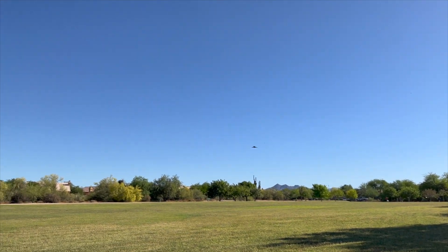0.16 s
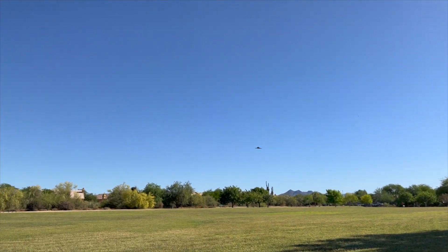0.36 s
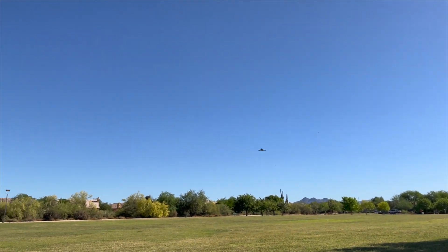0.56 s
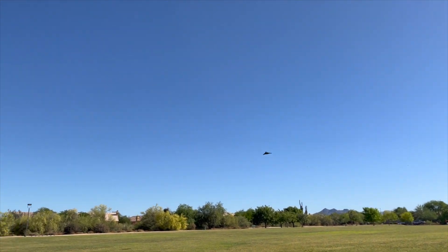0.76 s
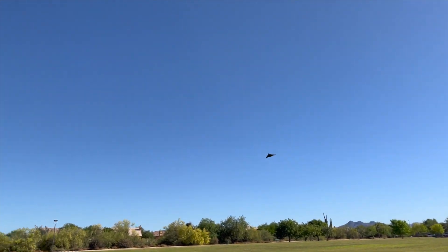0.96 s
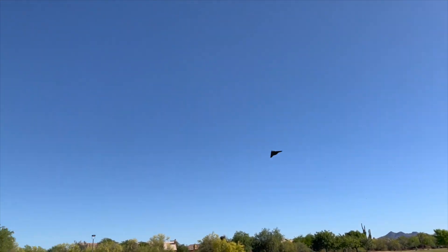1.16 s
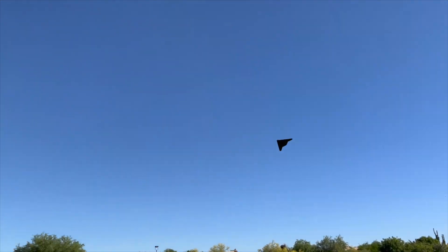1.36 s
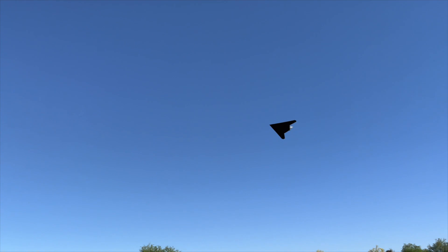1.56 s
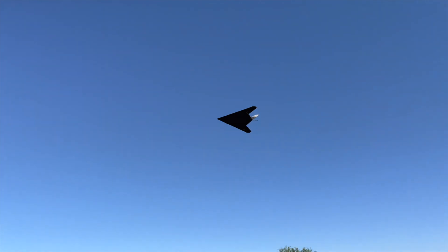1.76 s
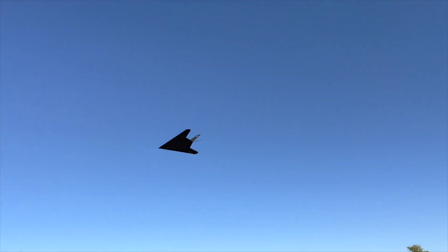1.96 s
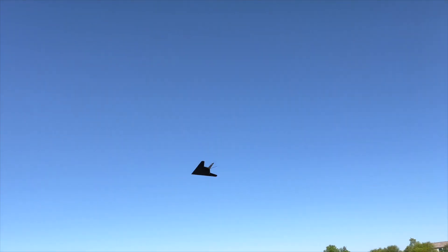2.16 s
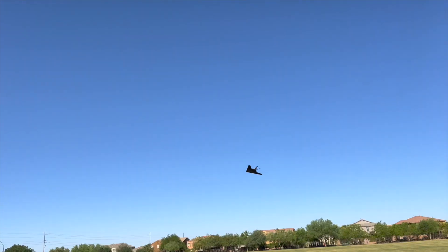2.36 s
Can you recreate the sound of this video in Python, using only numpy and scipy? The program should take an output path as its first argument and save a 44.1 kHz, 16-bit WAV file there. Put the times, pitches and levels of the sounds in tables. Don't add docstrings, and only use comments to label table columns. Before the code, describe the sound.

An electric ducted-fan model jet flies past, its whine and airy rush swelling, then falling in pitch

```python
import sys
import numpy as np
from scipy import signal
from scipy.fft import rfft, irfft
from scipy.io import wavfile
from scipy.ndimage import uniform_filter1d, map_coordinates

SR = 44100
rng = np.random.default_rng(int(sys.argv[2]) if len(sys.argv) > 2 else 0)


def put_to_file(sound):
    columns = np.atleast_2d(sound).T
    safe = np.clip(columns, -1, 1)
    whole_steps = np.round(safe * 32767)
    wavfile.write(sys.argv[1], SR, whole_steps.astype(np.int16))


def to_linear_factor(level_db):
    exponent = np.asarray(level_db, float) / 20
    return 10 ** exponent


N = 106192

HZ = np.fft.rfftfreq(N, 1 / SR) + 1e-3
LEFT_RIGHT = np.array([[1], [-1]])
BLADES = 11

# (frequency [Hz], left leads by [rad], left over right [dB], unrelated share [0-1])
PORTS = [(100, -.1, -1, .3), (600, -.3, -2.7, .08), (1300, -.2, -2.3, .25), (1700, -.7, -.5, .45),
         (2300, -.2, -1.5, .12), (3300, .25, 1.5, .14), (4300, -1.2, -2, .45), (4900, -3.4, -2, .5),
         (5600, -4.2, -1, .4), (6350, -3.14, -.5, .25), (7500, -4.5, -2, .15), (9300, -6.28, 0, .03),
         (12600, -9.42, 0, .03), (15500, -12.5, 0, .05)]


def walk(rate):
    hold = int(SR / rate)
    held = rng.standard_normal(N // 32)[np.arange(N) // hold]
    return 1.55 * uniform_filter1d(uniform_filter1d(held, hold), hold)


def smear(rate):
    return walk(rate) + 1j * walk(rate)


def across(table, column=1):
    table = np.array(table, float)
    return np.interp(np.log(HZ), np.log(table[:, 0]), table[:, column])


def curve(table, column=1):
    table = np.array(table, float)
    line = np.interp(np.arange(N) / SR, table[:, 0], table[:, column])
    return uniform_filter1d(line, size=2500, mode="nearest")


def air(colour, flicker_db, rate):
    inside = (HZ > colour[0][0]) & (HZ < colour[-1][0])
    spectrum = rfft(rng.standard_normal(N)) * to_linear_factor(across(colour)) * inside
    place = 3 * np.log2(HZ)
    noise = 0
    for band in range(int(place[inside][0]), int(place[inside][-1]) + 2):
        share = np.clip(1 - abs(place - band), 0, 1)
        noise = noise + irfft(spectrum * share, N) * to_linear_factor(flicker_db * walk(rate))
    return noise / np.std(noise)


def hump(centre_hz, wide_hz):
    return np.exp(-((HZ - centre_hz) / wide_hz) ** 2)


def ports(sound, extra_rad=0):
    gap = to_linear_factor(across(PORTS, column=2) / 2) * np.exp(.5j * (across(PORTS) + extra_rad))
    return irfft(rfft(sound) * np.array([gap, 1 / gap]), N)


def field():
    # (frequency [Hz], level [dB per Hz])
    rumble = [(12, -56), (20, -24.5), (65, -0.5), (92, -6.5), (124, -7), (178, -23.5), (289, -19),
              (325, -38), (450, -18.5), (580, -33), (990, -120)]
    # (time [s], swell [dB], length [s])
    gusts = [
        (.18, 6, .06),
        (.55, 7, .05),
        (.79, 4, .04),
        (.95, 6, .07),
        (1.29, 4, .04),
        (1.47, 3, .04),
        (1.83, 8, .05),
        (1.93, 8, .04),
    ]
    seconds = np.arange(N) / SR
    swell_db = sum(db * np.exp(-((seconds - at) / length) ** 2) for at, db, length in gusts)
    middle = air(rumble, flicker_db=0, rate=6.53)
    sides = to_linear_factor(-10) * air(rumble, flicker_db=0, rate=7) * LEFT_RIGHT
    return to_linear_factor(-48.5 + swell_db) * (middle + sides)


def grass_echo(tone, rest):
    # (time [s], lag [ms])
    ground_lag = [(0, .9), (.28, 1.01), (.53, 1.14), (.79, 1.32), (1.04, 1.6), (1.17, 1.75), (1.43, 2.29),
                  (1.68, 2.98), (1.81, 3.36), (1.94, 3.41), (2.07, 2.95), (2.2, 2.55), (2.32, 2.1),
                  (2.41, 1.85)]
    lag_ms = curve(ground_lag)
    mirrored = to_linear_factor(-3 - 1.3 * lag_ms) * rest + to_linear_factor(-24.5) * tone
    late = map_coordinates(mirrored, [np.arange(N) - lag_ms * SR / 1000], mode="mirror")
    dull = irfft(rfft(late) / np.sqrt(1 + (HZ / 6500) ** 4), N)
    return ports(dull, extra_rad=1.5 * hump(4650, 780))


def scattered(near_db, nose, belly):
    unrelated = np.clip(across(PORTS, column=3), 0, 1)
    stray = irfft(rfft(duct(near_db, nose, belly)) * unrelated * 1j, N)
    return stray * LEFT_RIGHT


def duct(near_db, nose, belly):
    # (frequency [Hz], level [dB per Hz])
    roar = [(60, -3), (90, -8), (170, -7), (330, -5.5), (500, -5.5), (870, -1), (1020, -2.5), (1300, -11)]
    rush = [(1000, -69), (1180, -1.5), (1550, 2.5), (1800, -5.5), (2100, -7), (2600, -5), (3400, -10),
            (4200, -26.5)]
    hiss = [(3600, -2.5), (4600, -6.5), (5600, 4), (6900, -1.5), (8500, -7), (10500, -12.5), (12500, -15.5),
            (15800, -18)]

    def layer(colour, db, follow, nose_db, belly_db, flicker_db):
        nearness_db = near_db[0] + follow * (near_db - near_db[0])
        level_db = db + nearness_db + nose_db * nose + belly_db * belly
        return air(colour, flicker_db, rate=13) * to_linear_factor(level_db)

    return (layer(roar, db=-8.5, follow=1.0941, nose_db=0, belly_db=3.5, flicker_db=1.1)
            + layer(rush, db=-0.79, follow=0.88, nose_db=-0.61, belly_db=1.33, flicker_db=1)
            + layer(hiss, db=-5.5, follow=1.0252, nose_db=-1.5, belly_db=-2, flicker_db=1))


def blades(phase, near_db, nose, belly):
    line_db = -8.5 - 5 * nose - 2.5 * belly + 2.5 * walk(20)
    line = to_linear_factor(line_db) * (1 + to_linear_factor(-8) * smear(66))
    shift = np.exp(1j * BLADES * 0.025 * phase)
    intake = to_linear_factor(-11 + 4 * nose) * smear(700) * shift
    return to_linear_factor(near_db) * np.imag((line + intake) * np.exp(1j * BLADES * phase))


def multiples(phase, near_db, nose, swing_db):
    # (multiple of the shaft, level over nearness [dB], gain nose-on [dB],
    #  share of the shaft tone's swing [0-1], flutter [dB], flutter rate [per s])
    orders = [
        (2, -13.5, 2, 0.57, 1, 18),
        (3, -12, 0.5, .05, 2, 14),
        (5, -26, 4, 0.036, 2.5, 14),
    ]
    total = 0
    for order, db, nose_db, share, flutter_db, rate in orders:
        level_db = near_db + db + nose_db * nose + share * swing_db + flutter_db * walk(rate)
        wave = np.sin(round(order) * phase + 6 * rng.random())
        total = total + np.sqrt(2) * to_linear_factor(level_db) * wave
    return total


def shaft(hz, tone_db):
    phase = 2 * np.pi * np.cumsum(hz * (1 + 0.00155 * walk(30.5))) / SR
    skirt = to_linear_factor(-26.5) * smear(79.52)
    loudness = np.sqrt(2) * to_linear_factor(tone_db + 0.66 * walk(8.73))
    return loudness * np.imag((1 + skirt) * np.exp(1j * phase)), phase


def scene():
    # (time [s], shaft tone [dB], nearness [dB])
    flight = [(0, -41.5, -46.5), (.45, -39, -45.5), (.75, -36.5, -43), (1.02, -34.5, -39),
              (1.2, -32, -37.5), (1.33, -35, -35.5), (1.45, -33.5, -34), (1.61, -20, -33.5),
              (1.78, -19, -31.5), (1.95, -17, -31), (2.05, -21, -32), (2.15, -35.5, -32.5),
              (2.24, -39.5, -33.5), (2.31, -33, -33), (2.41, -34.5, -34)]
    # (time [s], frequency [Hz])
    pitch = [(0, 629), (.5, 630), (1.05, 630.7), (1.36, 631.5), (1.5, 625), (1.66, 614), (1.78, 603),
             (1.87, 591.5), (2.04, 575), (2.17, 563.5), (2.41, 560.5)]
    hz, tone_db, near_db = curve(pitch), curve(flight), curve(flight, column=2)

    # 596 Hz at rest, 36 Hz more when flying straight at us
    nose = np.clip((hz - 596) / 36, -1, 1)
    belly = 1 - nose ** 2

    tone, phase = shaft(hz, tone_db)
    rest = multiples(phase, near_db, nose, tone_db - near_db)
    rest = rest + blades(phase, near_db, nose, belly)
    rest = rest + duct(near_db, nose, belly)
    direct = tone + rest

    passed = np.clip(.5 - nose, 0, 1)
    coming = ports((1 - passed) * direct + scattered(near_db, nose, belly))
    going = ports(passed * direct, extra_rad=1.09 * hump(6320, 900))
    jet = coming + going + grass_echo(tone, rest)
    pan_db = .6 * (belly - nose) / 2
    return jet * to_linear_factor(LEFT_RIGHT * pan_db / 2) + field()


def low_pass(x):
    return signal.sosfilt(signal.butter(12, 16950, fs=SR, output="sos"), x)


def record(dry):
    def outside(low_hz, high_hz):
        return np.clip(np.maximum(low_hz - HZ, HZ - high_hz) / 350 + .5, 0, 1)

    mid_filter = outside(11650, 13600)
    side_filter = outside(8350, 10500) * outside(15300, SR)
    mid = irfft(rfft(dry[0] + dry[1]) * mid_filter, N) / 2
    side = irfft(rfft(dry[0] - dry[1]) * side_filter, N) / 2
    return low_pass(np.array([mid + side, mid - side]))


dry = scene()
out = record(dry)
put_to_file(out)
```